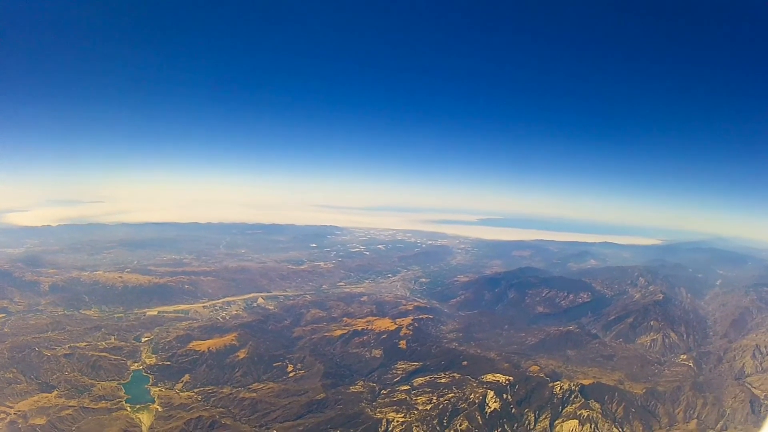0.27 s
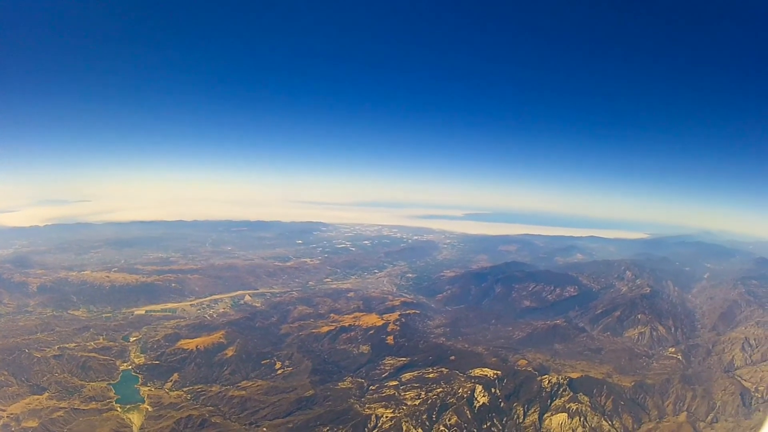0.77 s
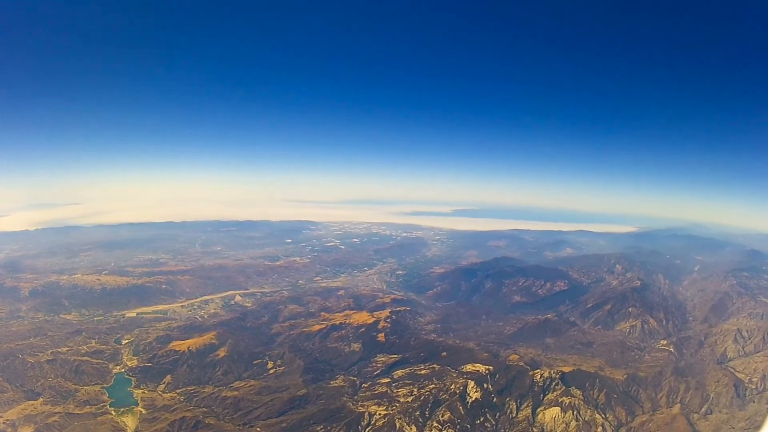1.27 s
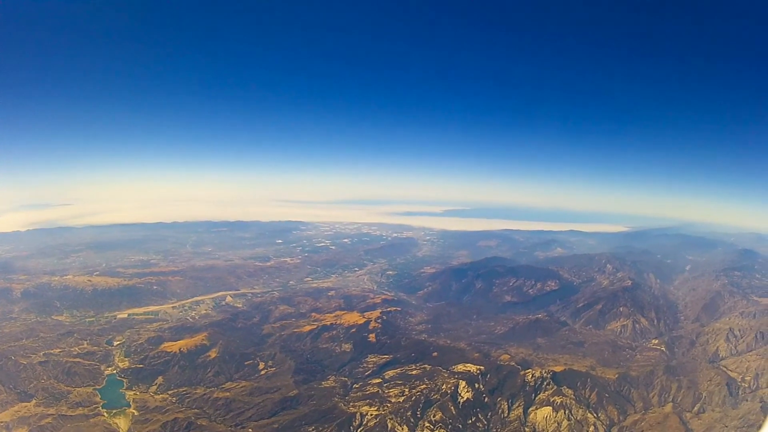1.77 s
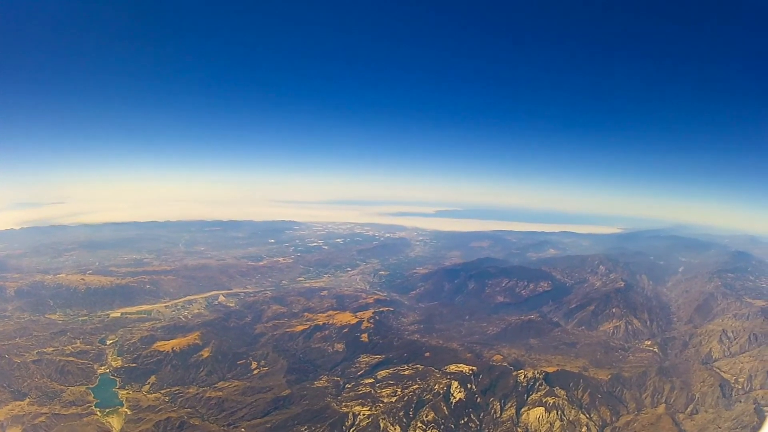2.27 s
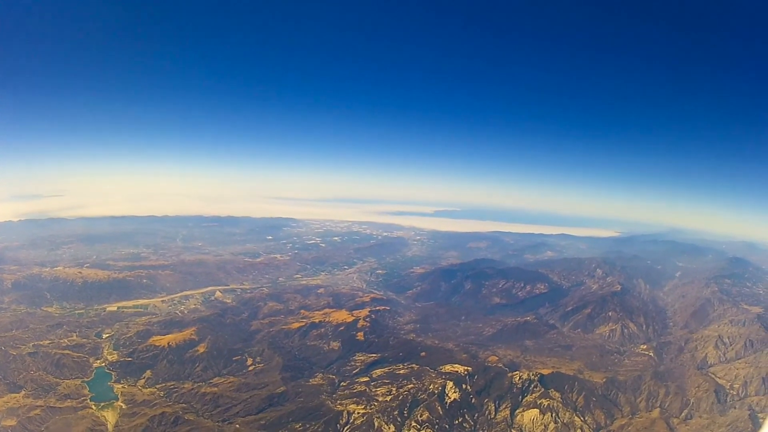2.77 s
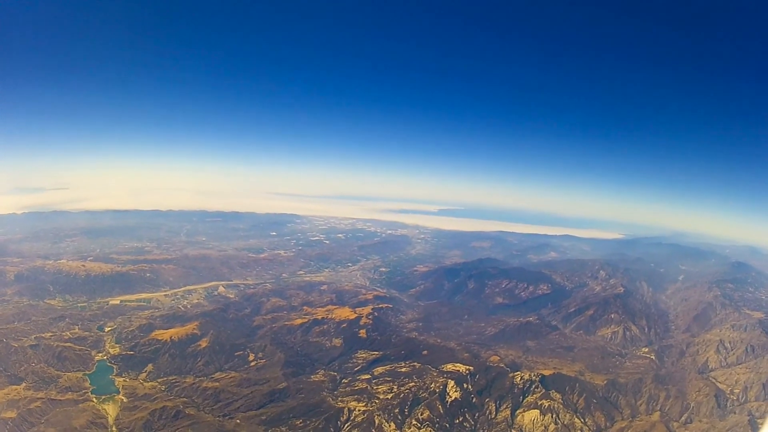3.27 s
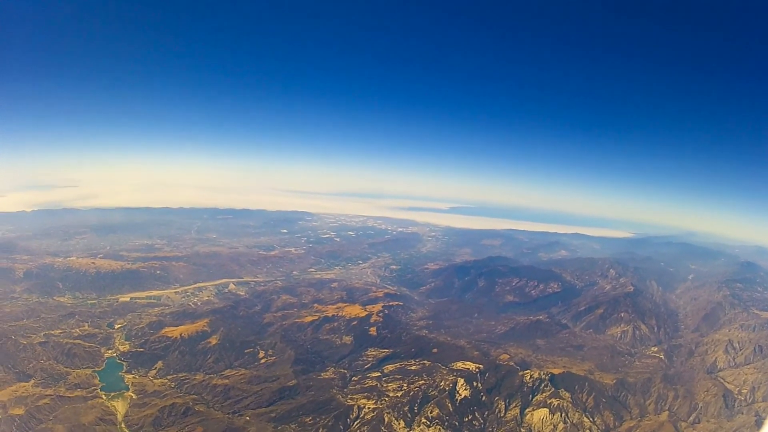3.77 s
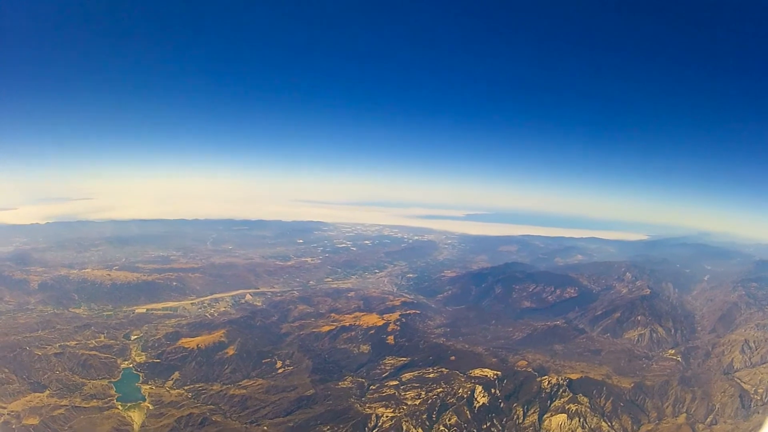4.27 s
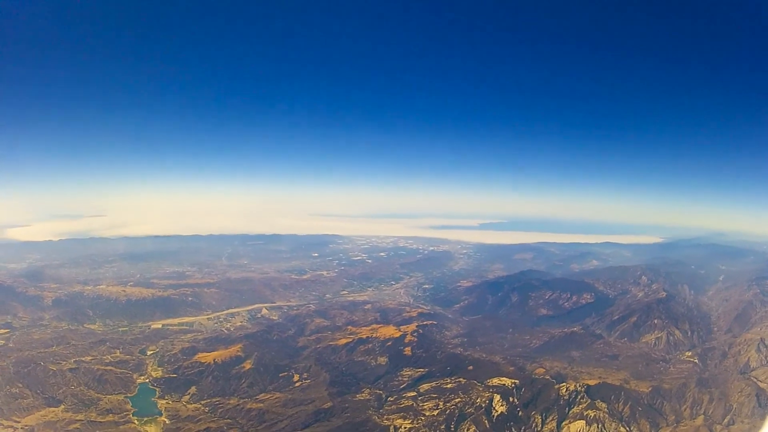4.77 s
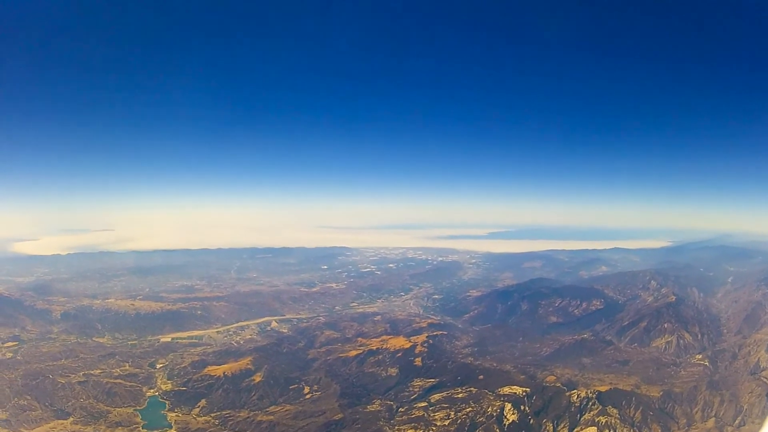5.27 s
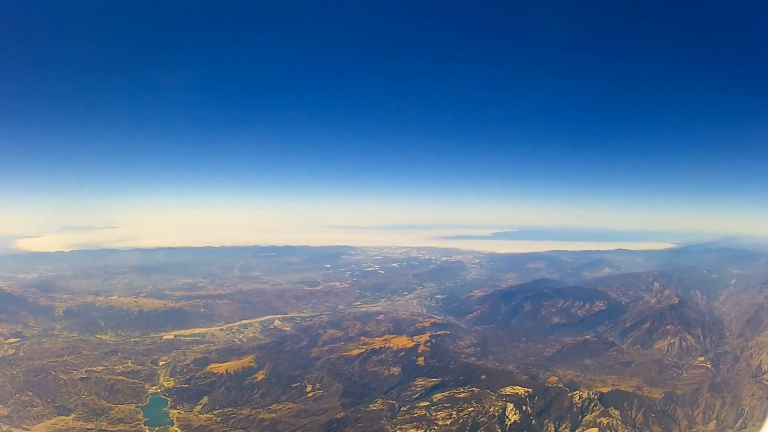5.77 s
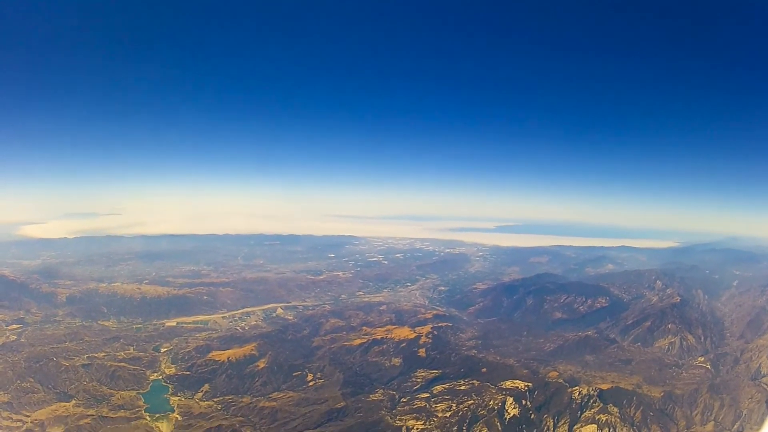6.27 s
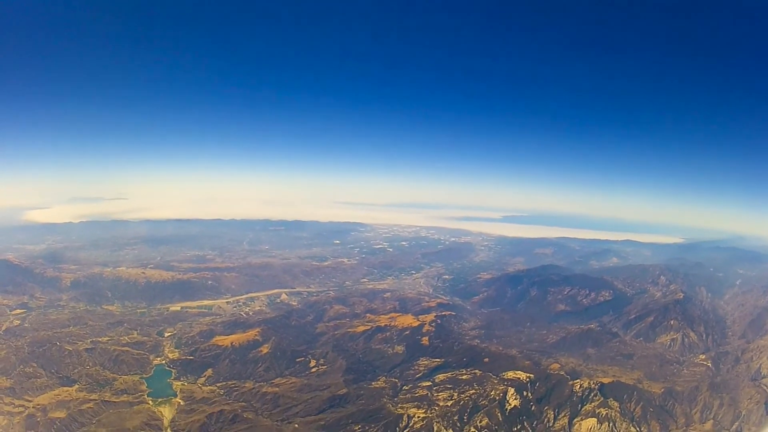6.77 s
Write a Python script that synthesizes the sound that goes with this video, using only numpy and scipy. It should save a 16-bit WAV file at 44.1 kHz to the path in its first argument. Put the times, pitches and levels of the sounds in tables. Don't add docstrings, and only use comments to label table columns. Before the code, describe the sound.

High in the air, a small camera inside a foam box hangs below a balloon. A very quiet, low hum of wind in the box walls swells and sags gently over faint hiss. At about 0.5 to 0.7 s a tight cluster of dry knocks and foam ticks rattles, with small dull thuds. A tiny tick comes at 1.6 s, a light knock at 2.3 s, a barely audible one at 3.2 s and another tap at 3.5 s. At 4.24 s the cord jerks tight: one extremely loud, hollow crack, close and abrupt, with a short boxy ring. Muffled bumps follow at 4.6, 4.8 and 5.4 s, faint ticks near 5.8 to 5.9 s, then knocks at 6.4, 6.5 and a clustered rattle at 6.8 s, ending with a faint tick at 7.0 s. Sound is dry, coarse, with grainy mirrored treble.

```python
import sys
import numpy as np
from scipy import signal
from scipy.fft import rfft, irfft, next_fast_len
from scipy.io import wavfile
from scipy.ndimage import uniform_filter1d

SR = 44100
rng = np.random.default_rng(int(sys.argv[2]) if len(sys.argv) > 2 else 0)


def wav_out(sig):
    wavfile.write(sys.argv[1], SR, np.round(np.clip(np.atleast_2d(sig).T, -1, 1) * 32767).astype(np.int16))


def linear_from_db(decibels):
    return 10 ** (np.asarray(decibels, float) / 20)


N = 310023

# frequency in Hz, density in dB per Hz.
HISS_SPECTRUM = [(20, -21), (40, -14), (70, -7.5), (120, -11.5), (200, -17.5), (330, -23), (500, -27),
                 (900, -34), (2000, -39), (4000, -41.5), (6000, -41)]
# centre in Hz, width in Hz, level in dB, gain of a full turn in dB.
HUM_MODES = [(96.9, 23.8, -57, 8.5), (132.7, 16, -56.5, -12.5), (334, 72, -66, -6)]
# time in seconds, gust in dB, turn of the broad wall into it 0-1.
SWAY = [(0, -3.5, 0), (.4, 0.5, 0.03), (1.25, -2, 0), (1.7, -0.5, 0.37), (2.3, -3.5, 0.27),
        (3.0, -0.8, 0.75), (3.4, -1, 0.9), (3.9, -1, 0.68), (4.35, 2.5, 0.66), (4.85, 0.2, 0.37),
        (5.2, -0.3, 0.77), (5.85, 0.6, 0.1), (6.6, -1.5, 0.65), (7.03, 0.2, 0.2)]
# start in seconds, peak in dB, centre in Hz, brightness in dB, T60 in seconds.
TICKS = [(0.4864, -61, 2380, -10.5, .015), (0.5557, -35, 2310, -2, .014), (0.5677, -48, 2050, -8, .016),
         (0.6234, -37.5, 2250, -33, 0.02), (1.6426, -51, 3700, -15, 0.0091),
         (2.3168, -39.5, 2800, -9, 0.011), (2.4132, -56.5, 2300, -30, 0.015),
         (3.1694, -51.5, 2800, -24, .016), (3.5343, -39.5, 2150, -7, 0.0073), (4.237, -24, 2590, 0, 0.0112),
         (4.7946, -45.5, 2130, -10, .009), (5.8087, -51.5, 2450, -23.5, .016),
         (5.9004, -66, 2710, -10.5, .014), (6.3752, -41, 2280, -2, 0.013), (6.3924, -49.5, 1920, -30, .013),
         (6.5295, -41, 2760, -7, 0.012), (6.755, -55, 2030, -16, .017), (6.769, -55, 2360, -6, .015),
         (6.795, -43.5, 2100, -3, .009), (7.0116, -55.5, 2220, -23, .022)]
# start in seconds, shell peak in dB, shell pitch in Hz,
# wall ring over the shell in dB, wall pitch in Hz.
KNOCKS = [(0.485, -40.5, 625, -0.5, 354), (0.557, -26, 698, 1.5, 450), (0.568, -36.5, 665, 4, 330),
          (0.6241, -30.5, 757, -3, 420), (0.6552, -42, 624, 3, 393), (2.3165, -33, 894, -7, 475),
          (2.416, -56, 755, -2, 460), (3.168, -54, 734, -10, 463), (3.5333, -37.5, 799, -0.5, 406),
          (4.7953, -36.5, 790, 3, 297), (5.8087, -48.5, 726, -5, 486), (5.901, -53.5, 750, -5, 477),
          (6.3745, -38.5, 900, 2, 474), (6.391, -43.5, 660, 2, 324), (6.53, -31, 916, -5.5, 400),
          (6.755, -41.5, 751, 9.5, 427), (6.7943, -30.5, 704, 3, 432), (7.012, -52.5, 831, -22, 388)]
# start in seconds, wall ring peak in dB, #
# wall pitch in Hz, box thud over the ring in dB.
BUMPS = [(0.573, -44.5, 380, 15), (3.539, -41.5, 347, -14), (0.613, -46, 382, 8), (0.664, -47.5, 378, 5),
         (2.334, -49, 346, 14), (4.639, -34.5, 331, 2.5), (4.644, -41.5, 346, -8), (4.839, -57, 320, 16.5),
         (5.3844, -40, 344, 4.5), (6.545, -51.5, 340, 17.5), (6.767, -34.5, 396, -1),
         (6.779, -38.5, 365, -1), (6.7948, -37.5, 452, 16.5), (0.627, -46, 400, 17), (2.317, -46, 404, 15),
         (4.797, -49.5, 334, 12), (6.3753, -34.5, 274, 3), (6.531, -48.5, 400, 15.5),
         (6.8352, -38, 347, 3.5)]
# frequency in Hz, level in dB, T60 in seconds.
BOX_MODES = [(111.1, -12.5, 0.25), (151.5, 5, 0.043), (227, -11.5, 0.049)]
# multiple of its pitch as a ratio, level in dB, T60 in seconds.
WALL_MODES = [(.85, -2.5, 0.02), (1.0, -8, 0.041), (1.25, -9, 0.025)]
# multiple of its pitch as a ratio, level in dB, T60 in seconds.
SHELL_MODES = [(.8, -4, 0.02), (1.0, 6, 0.02), (1.3, -6.5, 0.022), (1.7, -25, 0.031)]
# frequency in Hz, level in dB, T60 in seconds, side of the node +-1.
SNAP_MODES = [(119, -18.1, 0.125, -1), (139, -28.0, 0.346, -1), (208, -14.8, 0.047, 1),
              (232, -12.7, 0.06, 1), (295, -16.7, 0.096, -1), (339, -1.9, 0.051, 1),
              (398, -16.6, 0.054, -1), (514, -17.7, 0.028, -1), (708, -14.8, 0.028, -1),
              (847, -14.1, 0.027, 1), (1030, -15.9, 0.017, 1), (1477, -17.1, 0.007, -1),
              (2119, -22.4, 0.015, -1), (2919, -21.6, 0.009, 1), (3554, -22.2, 0.006, -1),
              (4127, -31.3, 0.014, 1)]
# frequency in Hz, threshold in dB over the usual level.
FLICKER_STEPS = [(8500, -9), (9600, -3), (10300, -1.2), (11400, -1), (11700, -5), (12400, -5), (12800, -.5),
                 (13400, 1.2), (14200, 2.8), (14500, 6), (16000, 7)]
# start in seconds, threshold shift in dB.
FLICKER_SPELLS = [
    (0, -.6),
    (.66, -1.1),
    (2.32, .9),
    (3.54, -.7),
    (4.25, 1.5),
    (4.65, -5),
    (4.8, .7),
    (6.55, 0),
]


def add(out, start_s, sound, peak_db):
    start = int(start_s * SR)
    out[start:][:len(sound)] += linear_from_db(peak_db) * sound / np.abs(sound).max()


def walk(rate_hz):
    hold = int(SR / rate_hz)
    steps = np.repeat(rng.standard_normal(N // hold + 1), hold)
    return 1.3 * uniform_filter1d(uniform_filter1d(steps, hold), hold)[:N]


def coloured(gain):
    noise = irfft(rfft(rng.standard_normal(N + N % 2)) * gain)[:N]
    return noise / noise.std()


def ring(modes, chance, scale, lag_s, hardness, scatter_db=1.5, detune=.02):
    t = np.arange(int(.3 * SR)) / SR
    out = 0
    for (hz, db, t60), (size, shift, sign) in zip(modes, chance):
        hz = hz * scale * (1 + detune * shift)
        late = np.maximum(t - abs(lag_s) * np.sqrt(300 / hz), 0)
        rise = 1 - np.exp(-late * hz * hardness)
        decay = np.exp(-np.log(1000) * late / t60)
        level = np.sign(sign) * linear_from_db(db + scatter_db * size)
        out = out + level * rise * decay * np.sin(2 * np.pi * hz * late)
    return out


def hiss(hz):
    points_hz, density_db = np.transpose(HISS_SPECTRUM)
    gain_db = np.interp(np.log(hz + 1), np.log(points_hz), density_db)
    return linear_from_db(-55) * coloured(linear_from_db(gain_db))


def hum(hz):
    s, gust_db, turn = np.transpose(SWAY)
    t = np.arange(N) / SR
    out = 0
    for centre_hz, width_hz, db, turn_db in HUM_MODES:
        mode = coloured(1 / (1 + ((hz - centre_hz) / (width_hz / 2)) ** 2))
        sway_db = np.interp(t, s, db + gust_db + turn_db * turn)
        out = out + mode * linear_from_db(sway_db + 1.83 + 1.2 * walk(8.2))
    return out


def ticks():
    out = np.zeros(N + SR)
    t = np.arange(2048) / SR
    hz = np.arange(1025) * SR / 2048
    width_hz = 600
    crackle = rng.standard_normal((len(TICKS), len(t)))
    for (s, db, centre_hz, top_db, t60), cells in zip(TICKS, crackle):
        burst = rfft(cells * (1 - np.exp(-t / 0.00037)) * np.exp(-np.log(1000) * t / t60))
        burst = burst / uniform_filter1d(np.abs(burst), size=17)
        broad = 0.5 / (0.5 + (hz / (4699.0 + 45 * top_db)) ** 7)
        body = broad + 1 / (1 + ((hz - centre_hz) / (width_hz / 2)) ** 2)
        body = body * hz ** 2 / (hz ** 2 + 1000. ** 2)
        top = linear_from_db(top_db - 1.5) / (1 + ((hz - 4100.) / 700.) ** 2)
        envelope = (1 - np.exp(-(t / .0005) ** 2)) * np.exp(-(t / t60) ** 4)
        add(out, s, irfft(burst * (body + top)) * envelope, db)
    return out[:N]


def knocks():
    out = np.zeros(N + SR)
    blows = []
    for s, db, hz, wall_db, wall_hz in KNOCKS:
        thud_db = -11.5 - 7 * np.log2(wall_hz / 400)
        blows.append((s, db, hz, db + wall_db, wall_hz, db + thud_db))
    for s, db, hz, thud_db in BUMPS:
        blows.append((s, db - 11.5, 664, db, hz, db + thud_db))
    chance = rng.standard_normal((len(blows), 3, 4, 3))
    for (s, db, shell_hz, wall_db, wall_hz, thud_db), c in zip(blows, chance):
        add(out, s, ring(SHELL_MODES, c[0], shell_hz, lag_s=0.00092, hardness=1.4), db)
        add(out, s, ring(WALL_MODES, c[1], wall_hz, lag_s=0.0009, hardness=1.15), wall_db + 3.0)
        add(out, s, ring(BOX_MODES, c[2], 1, lag_s=0.00094, hardness=12.0), thud_db + 0.1)
    return out[:N]


def snap():
    out = np.zeros(N + SR)
    modes = np.array(SNAP_MODES)
    sides = modes[:, 3:] * [0, 0, 1]
    add(out, 4.23704, ring(modes[:, :3], sides, 1, lag_s=.00072, hardness=17), 0.8)
    return out[:N]


def scene():
    hz = np.arange((N + 1) // 2 + 1) * SR / (N + N % 2)
    capsule = signal.butter(2, 70, "high", fs=SR, output="sos")
    blows = signal.sosfilt(capsule, snap() + knocks() + ticks())
    return (blows + hum(hz) + hiss(hz))[None]


def sample_and_hold(dry):
    rate_hz, guard_hz, guard_slope, top_hz = 12000, 5200, 0.88, 15300
    size = next_fast_len(N)
    hz = np.arange(size // 2 + 1) * SR / size
    warp = np.tan(np.pi * np.minimum(hz / rate_hz, .4999)) / np.tan(np.pi * min(guard_hz / rate_hz, .49))
    guard = (hz < rate_hz / 2) / np.hypot(1, warp ** guard_slope)
    guarded = irfft(rfft(dry, size) * guard, size)
    pulses = 1 + 2 * np.cos(2 * np.pi * rate_hz * np.arange(size) / SR)
    sampled = rfft(guarded * pulses)
    held = sampled * np.sinc(hz / rate_hz) / np.sinc(hz / (4 * rate_hz))
    return irfft(held / (1 + (hz / top_hz) ** 90), size)[:, :N]


def treble_flicker(x):
    hz, s, cells = signal.stft(x, SR, nperseg=1024)
    bands = np.add.reduceat(np.abs(cells) ** 2, np.arange(0, len(hz), 5), axis=1)
    power = np.repeat(uniform_filter1d(bands, size=2, axis=2), 5, axis=1)[:, :len(hz)]
    starts, held_db = np.transpose(FLICKER_SPELLS)
    changes = np.diff(held_db, prepend=0)
    shift_db = sum((s >= start) * change for start, change in zip(starts, changes))
    drift_db = np.outer(np.interp(hz, [11000, 13000], [.3, 1]), shift_db)
    step_db = np.interp(hz, *np.transpose(FLICKER_STEPS), left=-40)[:, None] + drift_db
    step = np.median(power, axis=2, keepdims=True) * linear_from_db(step_db) ** 2
    kept = np.where(power < 2 * step, linear_from_db(2.3), 1)
    gain = np.where(power > step, kept, linear_from_db(-19.5))
    return signal.istft(cells * gain, SR, nperseg=1024)[1][:, :N]


def top_cut(x):
    return signal.sosfilt(signal.butter(12, 16370, fs=SR, output="sos"), x)


def record(dry):
    mix = treble_flicker(sample_and_hold(dry))
    return top_cut(mix)


dry = scene()
out = record(dry)
wav_out(out)
```